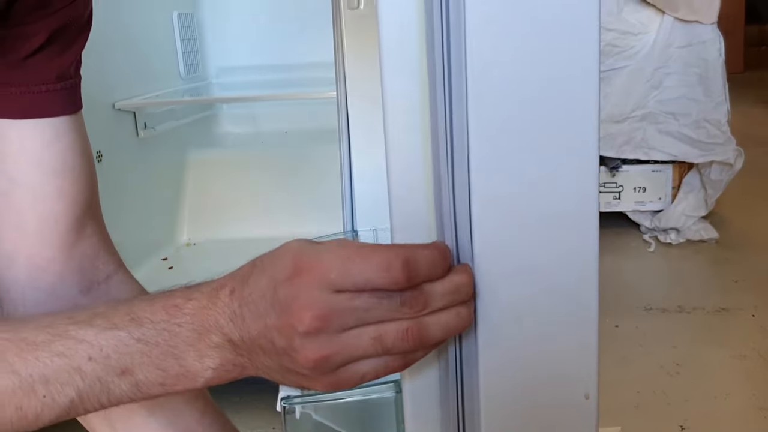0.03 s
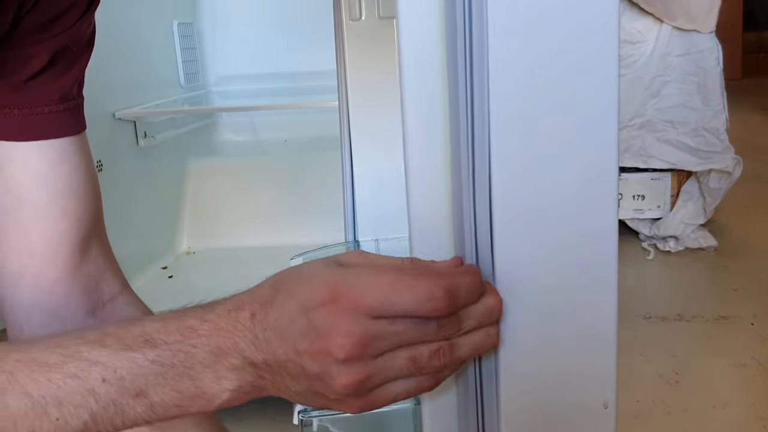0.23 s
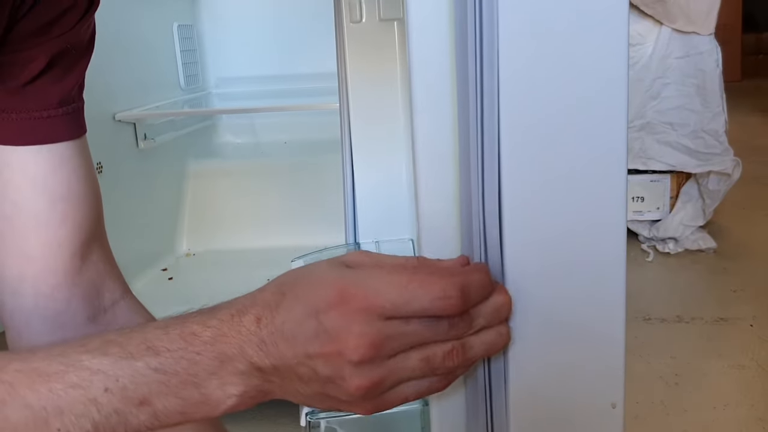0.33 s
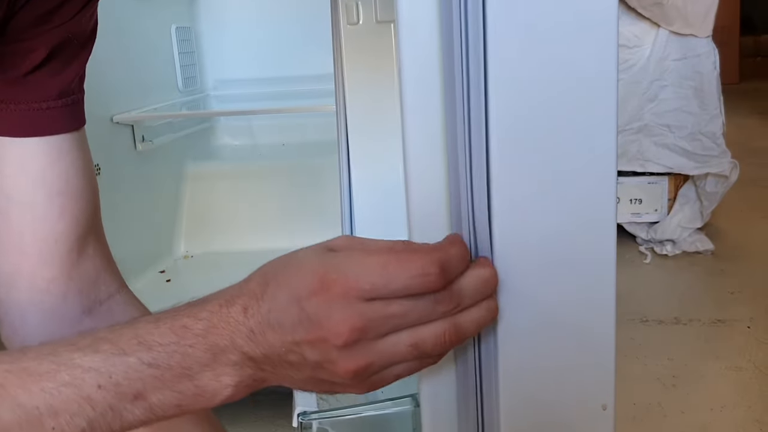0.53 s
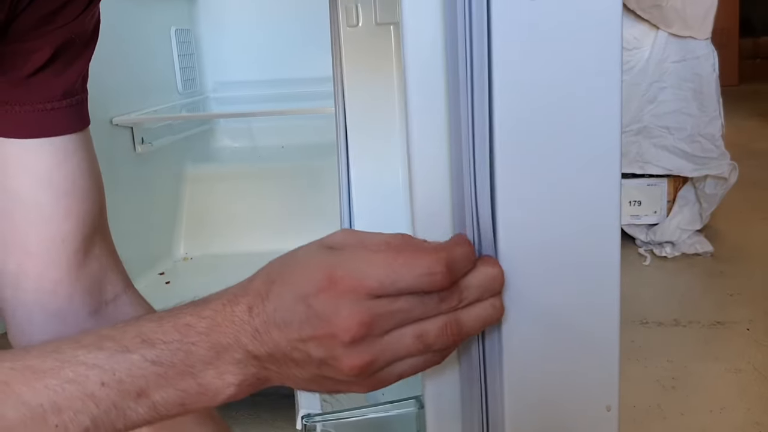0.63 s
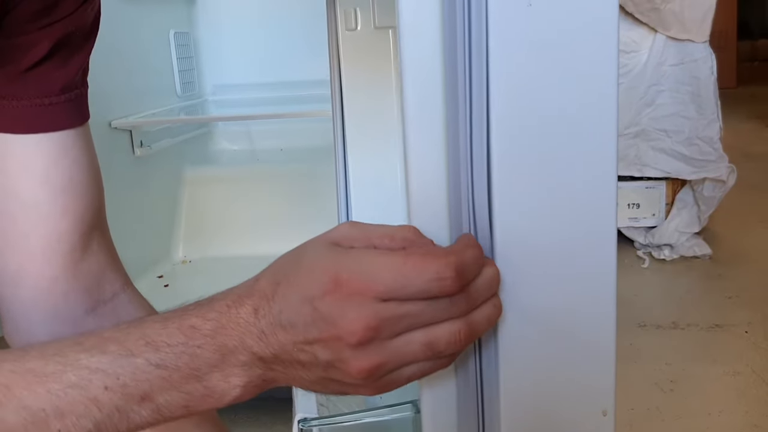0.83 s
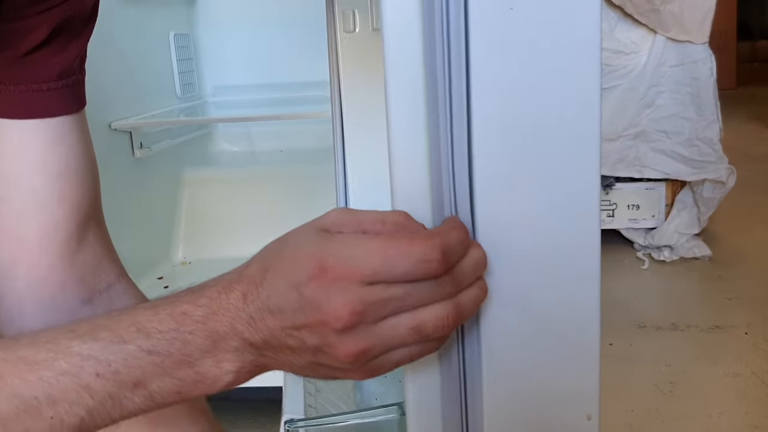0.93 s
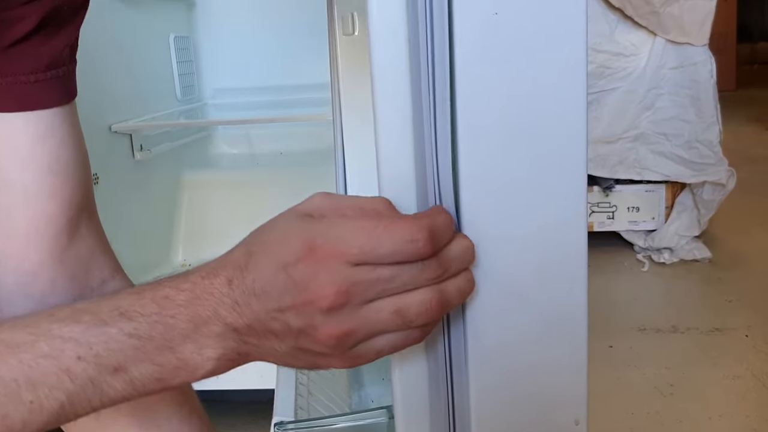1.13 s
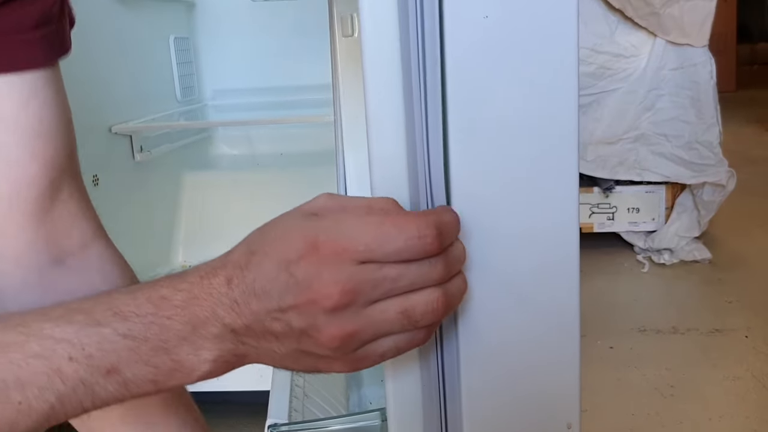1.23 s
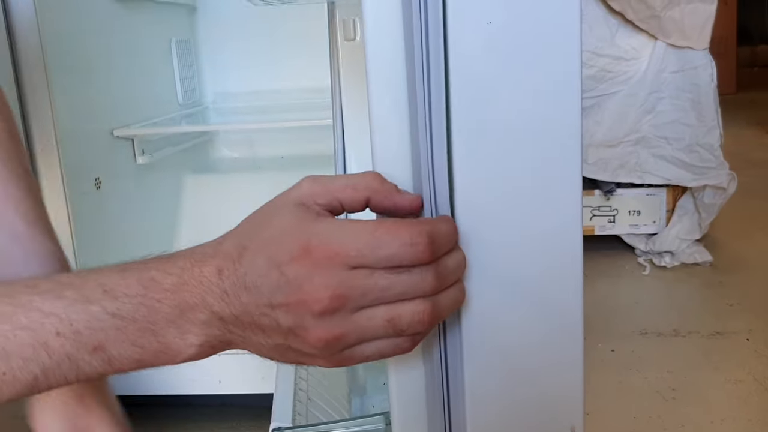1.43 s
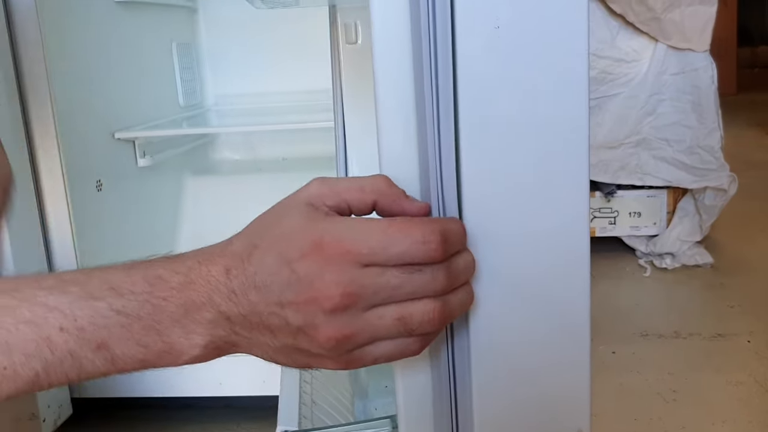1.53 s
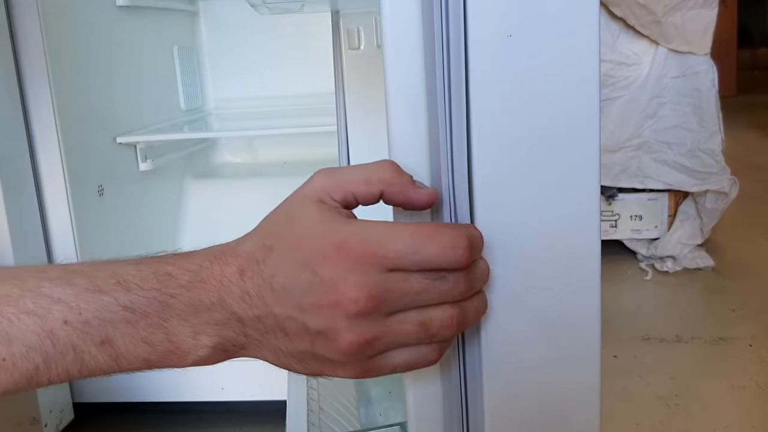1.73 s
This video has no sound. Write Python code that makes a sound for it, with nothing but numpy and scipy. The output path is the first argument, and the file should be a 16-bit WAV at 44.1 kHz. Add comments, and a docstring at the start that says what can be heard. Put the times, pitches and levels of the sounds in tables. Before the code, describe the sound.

A fridge door seal, worked by hand close to the microphone, snaps with one sharp plastic crack at about 0.2 seconds. Fingers faintly tick, nudge and rub along the rubber. From about 1.1 to 1.4 seconds the seal flops into place with a quick cluster of soft slaps and hollow door thumps. A faint door rumble and low motor hum continue underneath in the small room.

```python
"""The rubber seal of an open fridge door, worked by hand close to the microphone in a small room.
Its plastic strip snaps once, a crack ringing its modes; fingers tick, nudge and rub along it.
Then the seal flops home, slapping the liner and thumping the hollow door.
Underneath, the door sways, a motor hums and room air murmurs.
The right microphone port is shaded and hears little treble."""
import sys
import numpy as np
from scipy import signal
from scipy.fft import rfft, irfft, next_fast_len
from scipy.io import wavfile
from scipy.ndimage import map_coordinates

SR = 44100
rng = np.random.default_rng(int(sys.argv[2]) if len(sys.argv) > 2 else 0)


def digitize_waveform(pressure):
    """Quantize a signal to 16-bit integers and store it at the path in sys.argv[1].

    Rows of a 2-D input are taken as channels; values are limited to [-1, 1].
    """
    field = np.atleast_2d(pressure).T
    bounded = np.clip(field, -1, 1)
    quanta = np.round(bounded * 32767).astype(np.int16)
    wavfile.write(sys.argv[1], SR, quanta)


N = 79380
T = np.arange(SR // 2) / SR  # time within one hit [s]

# plastic strip modes: (frequency [Hz], level [dB], t60 [s])
STRIP_MODES = [(387, -25, .18), (798, -18.5, 0.11), (921, -10.5, 0.14), (1086, -12.5, .07),
               (1190, -7, 0.047), (1690, -14.5, 0.028), (2320, -4, 0.11), (2537, 4.5, .045),
               (3043, -0.5, .055), (3650, -2.5, 0.023), (4085, -2, 0.037), (4430, -2, .035),
               (4790, -2.5, .04), (5560, 0, .022)]
# crack spectrum: (frequency [Hz], density [dB])
CRACK_COLOUR = [(200, -36), (420, -11), (1200, -2), (1900, -3), (3500, 5.5), (5600, -2), (6900, -22),
                (8300, -12), (12000, -25), (16000, -27.5)]


def snap():
    """The strip snaps and chatters; returns the near sound and the impulse that fills the room."""
    # snap and chatter: (time [s], level [dB])
    hits = [(0.2319, -18), (.2335, -22), (.2384, -27.5)]
    # spectrum sent to the room: (frequency [Hz], density [dB])
    echo_colour = [(90, -13.5), (220, -4.5), (390, 2.5), (640, -6), (1100, -4), (1600, -5), (2600, -1),
                   (4500, -1), (5600, -3), (6600, -10.5), (8300, -11), (12000, -21), (15500, -33)]
    near, far = np.zeros(N), np.zeros(N)
    for time_s, db in hits:
        add(near, time_s, amp(db) * (ring(STRIP_MODES, scatter_db=1.1) + amp(10) * crack()))
    onset_s = hits[0][0]
    add(near, onset_s, amp(4) * click(CRACK_COLOUR))
    add(far, onset_s, amp(2.5) * click(echo_colour))
    return near, far


def crack():
    """Cracking plastic: a brief noise burst."""
    return noise(CRACK_COLOUR, len(T)) * fade(t60_s=0.025)


def seal_bumps():
    """Rubber lands softly: each contact slaps, rings the liner and thumps the hollow door."""
    # contacts: (time [s], slap [dB], tilt [dB/octave], thump [dB])
    bumps = [(.385, -48, 4, -65), (.443, -47, 3.5, -73), (.542, -47.5, 2.5, -57), (.648, -47.5, -4, -46),
             (.665, -49.5, -4, -51), (.735, -51, -0.5, -70), (.835, -55, 1.5, -59), (.952, -48.5, 1, -53),
             (1.022, -49.5, -2, -52), (1.055, -63, -5, -56), (1.122, -52, -2, -35.5),
             (1.148, -48, 2.5, -46), (1.168, -49, -2.5, -55), (1.246, -36, 4, -53), (1.2622, -25, 0, -30.5),
             (1.2772, -22, 1, -24.5), (1.286, -26.5, -2.5, -36.5), (1.2956, -34, -0.5, -28),
             (1.314, -44.5, 4.5, -27.5), (1.354, -52, -5.5, -31), (1.376, -58.5, 6.5, -37.5),
             (1.465, -53.5, -3.5, -47)]
    # rubber slap spectrum: (frequency [Hz], density [dB])
    slap_colour = [(80, -2.5), (300, -4), (900, 0), (1500, -6), (3000, -14), (5000, -27.5), (9000, -41),
                   (15000, -48)]
    # door liner: (frequency [Hz], level [dB], t60 [s])
    liner_modes = [(389.2, 1.5, .12), (450, -18, 0.45), (634, -3.5, 0.12), (686, -3, 0.062),
                   (787.6, -1, 0.1), (941, -7.5, 0.1), (1050, -2, 0.058), (1478, -8.5, .05),
                   (1770, -22, 0.1), (2332, -5, 0.026), (3010, -8.5, .035)]
    # hollow door: (frequency [Hz], level [dB], t60 [s])
    door_modes = [(56, -21, 0.3), (76, -1, 0.23), (103.5, -4, 0.19), (116, -1, 0.13), (150.3, -1.5, 0.18),
                  (177.9, -2.5, 0.28), (247, -17.5, 0.17), (311.2, -20.5, 0.22)]
    slap_attack_s, thump_attack_s = 0.0012, 0.0025
    out = np.zeros(N)
    for time_s, slap_db, tilt_db_oct, thump_db in bumps:
        envelope = fade(t60_s=0.065) * (1 - np.exp(-T / slap_attack_s))
        slap = amp(-0.5) * noise(slap_colour, len(T), tilt_db_oct) * envelope
        liner = amp(-5) * ring(liner_modes, scatter_db=0, tilt_db_oct=tilt_db_oct)
        thump = ring(door_modes, scatter_db=1) * (1 - np.exp(-T / thump_attack_s))
        add(out, time_s, amp(slap_db) * (slap + liner) + amp(thump_db) * thump)
    return out


def ticks():
    """The strip ticks faintly, damped by the fingers; softer ticks are duller."""
    # strip ticks: (time [s], level [dB])
    hits = [(0.063, -63), (0.146, -56.5), (.178, -59), (0.4433, -48), (0.5261, -56), (0.597, -56.5),
            (0.7502, -54.5), (0.816, -60), (0.9537, -61), (1.0818, -60), (1.1509, -56.5), (1.1697, -58.5),
            (1.246, -45.5), (1.3776, -52.5)]
    hardest_db = max(db for _, db in hits)
    hardening_db_per_db = 0.6
    finger_damping = fade(t60_s=0.06)
    out = np.zeros(N)
    for time_s, db in hits:
        crack_db = 4.5 + hardening_db_per_db * (db - hardest_db)
        strip = amp(-4.5) * ring(STRIP_MODES, scatter_db=3) * finger_damping
        add(out, time_s, amp(db) * (strip + amp(crack_db) * crack()))
    return out


def rubbing():
    """Skin rubs the rubber with a fine, uneven grain; a finger hisses as it slides off."""
    # rub envelope: (time [s], level [dB])
    rub_levels = [(0, -73.5), (.14, -62.5), (.45, -68.5), (.68, -67), (.83, -59.5), (.93, -67),
                  (1.08, -68.5), (1.22, -65), (1.38, -59.5), (1.55, -64.5), (1.7, -58.5), (1.8, -67.5)]
    # rub spectrum: (frequency [Hz], density [dB])
    rub_colour = [(200, 2), (800, -2.5), (1700, -3.5), (3000, 3.5), (4800, -2), (6800, -23.5), (10000, -33),
                  (15000, -38)]
    # slide envelope: (time [s], level [dB])
    slide_levels = [(1.3, -97.5), (1.4, -75), (1.72, -73.5), (1.8, -79.5)]
    # slide spectrum: (frequency [Hz], density [dB])
    slide_colour = [(3000, -25), (5800, 0), (7000, -5), (8500, -1), (10000, -12), (15000, -19)]
    grain = unit(amp(wobble(rate_hz=230)))
    rub = level(rub_levels) * noise(rub_colour, N)
    slide = level(slide_levels) * noise(slide_colour, N)
    return grain * (rub + slide)


def door_sway():
    """The door rumbles as it sways under the hand."""
    # sway envelope: (time [s], level [dB])
    levels = [(0, -48.5), (.5, -55), (.68, -45.5), (.8, -58.5), (1.0, -53), (1.1, -40), (1.2, -42),
              (1.26, -53), (1.38, -40), (1.49, -38), (1.62, -44.5), (1.8, -49)]
    # rumble spectrum: (frequency [Hz], density [dB])
    colour = [(20, -38.5), (33, -21.5), (50, 1.5), (70, 0), (100, -4), (180, -16.5), (260, -23.5),
              (400, -22.5), (700, -29.5), (1500, -44.5), (4000, -67)]
    return level(levels) * stereo_noise(colour)


def motor():
    """Low hum on multiples of the shaft speed, each line wavering."""
    # hum lines: (shaft multiple, rms level [dB])
    lines = [(2, -55.5), (3, -50), (4, -49), (5, -57), (6, -62), (7, -63), (12, -62.5), (15, -71)]
    shaft_hz, waver_db, drift_rad = 26.33, 2, 0.34
    turns = shaft_hz * np.arange(N) / SR
    out = np.zeros(N)
    for multiple, db in lines:
        peak = np.sqrt(2) * amp(db + waver_db * wobble(rate_hz=5))
        phase = 2 * np.pi * (multiple * turns + rng.random())
        out += peak * np.sin(phase + drift_rad * wobble(rate_hz=4))
    return out


def room_air():
    """Still air: faint, steady, low noise."""
    # air spectrum: (frequency [Hz], density [dB])
    colour = [(20, -12), (50, -5), (100, -1), (220, -10.5), (400, -10.5), (600, -18.5), (1100, -20),
              (2000, -29), (5000, -47.5), (9000, -76)]
    return amp(-53) * stereo_noise(colour)


def room(x):
    """Diffuse stereo tail that builds up briefly and lasts longest in the bass."""
    # room decay: (frequency [Hz], t60 [s])
    decay = [(100, .4), (400, 0.34), (1500, 0.36), (4000, 0.36), (9000, .29), (15000, 0.33)]
    build_s = 0.014
    hz, time_s, spectra = signal.stft(rng.standard_normal((2, len(T))), SR, nperseg=256)
    spectra *= amp(-60 * time_s / along(decay, hz)[:, None])
    tail = signal.istft(spectra, SR, nperseg=256)[1][:, :len(T)]
    tail *= 1 - np.exp(-(T / build_s) ** 2)
    return signal.fftconvolve(x[None], tail / np.linalg.norm(tail[0]), axes=1)[:, :N]


def ring(modes, scatter_db, tilt_db_oct=0):
    """Damped modes of alternating sign; levels scattered, and tilted about 1 kHz."""
    out = np.zeros(len(T))
    for k, (hz, db, t60_s) in enumerate(modes):
        gain = amp(db + scatter_db * rng.standard_normal() + tilt_db_oct * np.log2(hz / 1000))
        out += (-1) ** k * gain * fade(t60_s) * np.sin(2 * np.pi * hz * T)
    return out


def click(colour):
    """Coloured impulse of energy 1."""
    pulse = causal(1.0 * (T == 0), colour)
    return pulse / np.linalg.norm(pulse)


def noise(colour, count, tilt_db_oct=0):
    """Coloured noise of rms 1."""
    white = rng.standard_normal(count)
    return unit(filtered(white, lambda hz: amp(along(colour, hz) + tilt_db_oct * np.log2(hz + 1))))


def stereo_noise(colour):
    """Coloured noise, nearly mono in the bass."""
    # left-right likeness: (frequency [Hz], correlation)
    likeness = [(50, 0.99), (150, 0.92), (400, 0.81), (1500, .3), (5000, .1)]
    angle_rad = lambda hz: np.arccos(along(likeness, hz)) / 2
    mid = filtered(noise(colour, N), lambda hz: np.cos(angle_rad(hz)))
    side = filtered(noise(colour, N), lambda hz: np.sin(angle_rad(hz)))
    return np.array([mid + side, mid - side])


def filtered(x, response):
    """Zero-phase filter of gain response(hz)."""
    n = x.shape[-1]
    size = next_fast_len(n + 8192)
    return irfft(rfft(x, size) * response(np.fft.rfftfreq(size, 1 / SR)), size)[..., :n]


def causal(x, points, size=2048):
    """Minimum-phase filter from (Hz, dB) points: no ringing ahead of a hit."""
    cepstrum = irfft(np.log(amp(along(points, np.fft.rfftfreq(size, 1 / SR)))))
    cepstrum[1:size // 2] *= 2
    cepstrum[size // 2 + 1:] = 0
    return signal.fftconvolve(x, irfft(np.exp(rfft(cepstrum))))[:len(x)]


def amp(db):
    """Decibels to gain."""
    return 10 ** (np.asarray(db) / 20)


def unit(x):
    """Scale to rms 1."""
    return x / np.sqrt(np.mean(x ** 2) + 1e-20)


def along(points, hz):
    """(Hz, value) points read on a log axis."""
    knots_hz, values = np.transpose(points)
    return np.interp(np.log(hz + 1), np.log(knots_hz + 1), values)


def level(points):
    """Gain per sample from (s, dB) points."""
    return amp(np.interp(np.arange(N) / SR, *np.transpose(points)))


def wobble(rate_hz):
    """Smooth random curve, rate_hz knots a second."""
    return map_coordinates(rng.standard_normal(1024), [np.arange(N) * rate_hz / SR], mode="wrap")


def fade(t60_s):
    """Decay of 60 dB in t60_s."""
    return amp(-60 * T / t60_s)


def add(track, time_s, sound):
    """Mix a sound in at time_s."""
    part = track[round(time_s * SR):][:len(sound)]
    part += sound[:len(part)]


def scene():
    """The close door, its reverberation and the background, in stereo."""
    # extra right-side shading of the direct sound: (frequency [Hz], gain [dB])
    near_shade = [(300, 1), (1200, 1), (2500, -2), (6000, -2)]
    # handling sent to the room: (frequency [Hz], gain [dB])
    room_send = [(60, -19), (300, -6), (1000, -13), (3000, -13), (6000, -7.5), (9000, -4.5), (15000, -9)]
    snapped, echo = snap()
    handling = ticks() + seal_bumps() + rubbing()
    near = snapped + handling
    background = door_sway() + motor() + room_air()
    direct = np.array([near, causal(near, near_shade)])
    return direct + room(echo) + room(causal(handling, room_send)) + background


def record(dry):
    """Shaded right port, faint hiss, soft clipping and a band limit."""
    # right port response: (frequency [Hz], gain [dB])
    port_shade = [(100, -0.55), (300, -1), (700, -6), (1300, -6), (2500, -11), (4500, -16.5), (6000, -21),
                  (7000, -31), (8500, -34), (11000, -18.5), (16000, -18)]
    hiss_db, top_hz = -82.5, 15800
    x = np.array([dry[0], causal(dry[1], port_shade)])
    x += amp(hiss_db) * rng.standard_normal((2, N))
    clipped = x / (1 + np.abs(x) ** 6) ** (1 / 6)
    return filtered(clipped, lambda hz: (1 - np.tanh((hz - top_hz) / 150)) / 2)


dry = scene()
out = record(dry)
digitize_waveform(out)
```